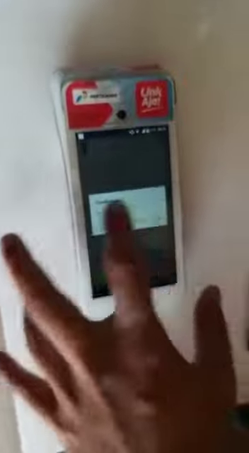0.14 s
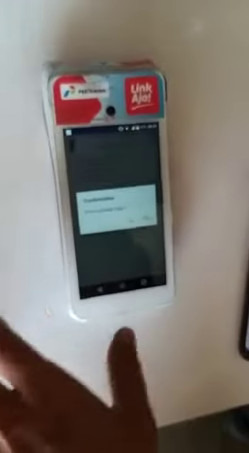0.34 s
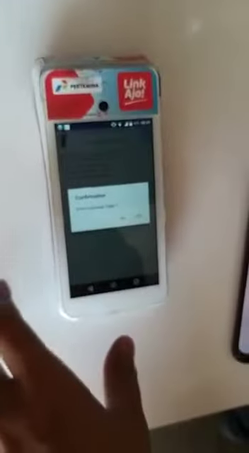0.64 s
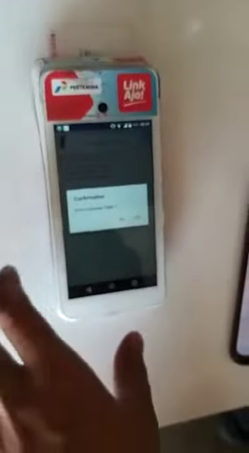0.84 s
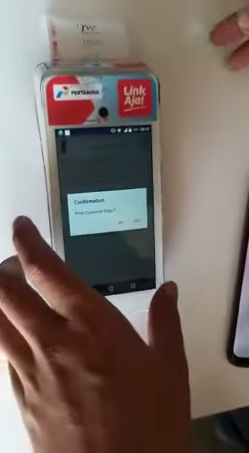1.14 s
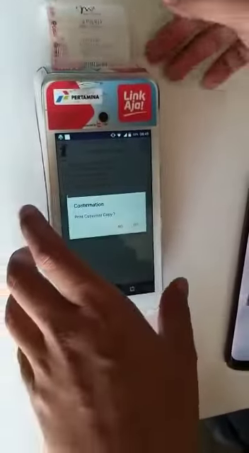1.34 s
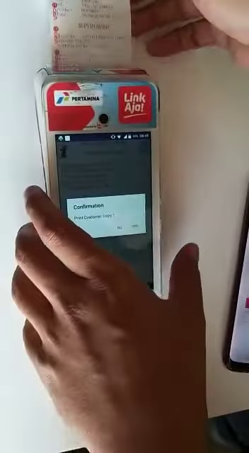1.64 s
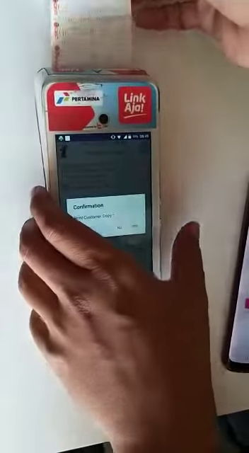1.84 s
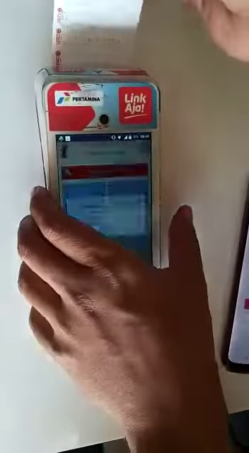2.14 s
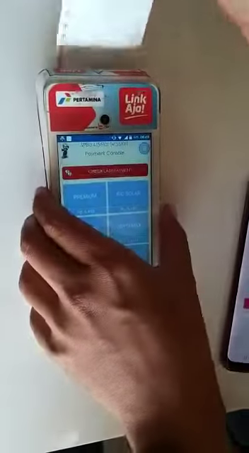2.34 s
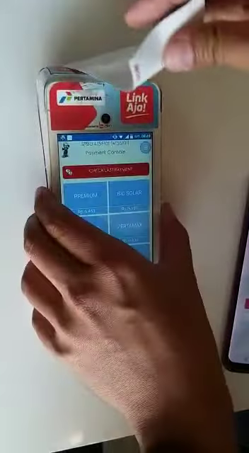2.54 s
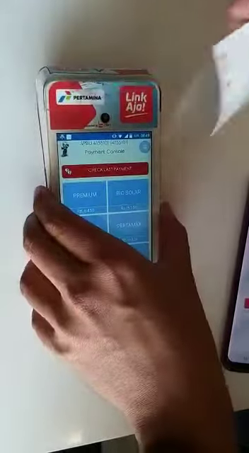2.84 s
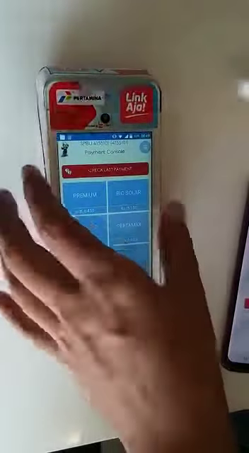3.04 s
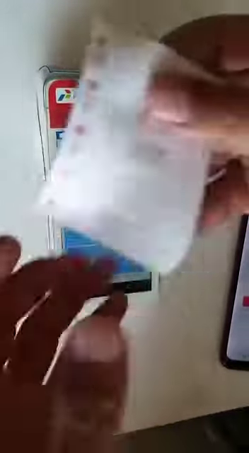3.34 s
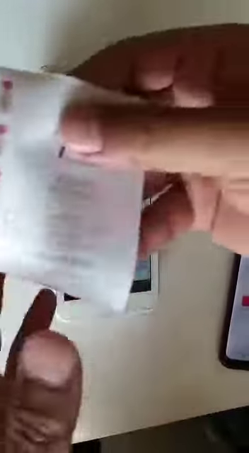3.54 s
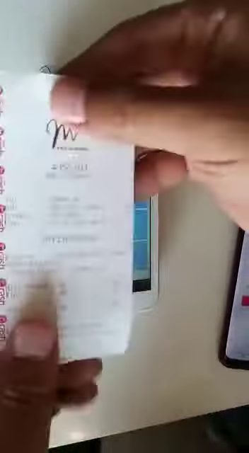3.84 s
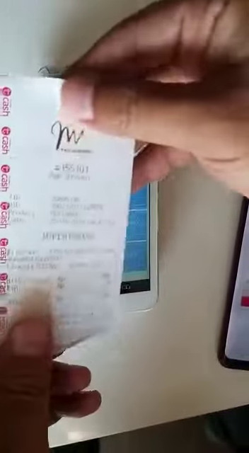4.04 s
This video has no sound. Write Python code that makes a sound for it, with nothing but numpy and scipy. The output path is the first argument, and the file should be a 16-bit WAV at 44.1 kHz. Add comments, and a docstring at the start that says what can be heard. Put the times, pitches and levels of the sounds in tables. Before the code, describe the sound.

A small receipt printer buzzes unevenly and stops; the paper is ripped off sharply, rustles softly and snaps taut.

```python
"""The stepper motor of a handheld payment terminal buzzes unevenly as it prints a receipt on a desk:
each step is an impulse that excites the resonances of the motor and its plastic case.
The paper is gripped, ripped across the toothed cutter and pulled taut between two hands; friction
makes it rustle, and fracture makes it crackle. Nearby walls give a short echo over a low outdoor rumble."""
import sys
import numpy as np
from scipy import signal
from scipy.fft import rfft, irfft
from scipy.io import wavfile
from scipy.ndimage import uniform_filter1d

SR = 44100
rng = np.random.default_rng(int(sys.argv[2]) if len(sys.argv) > 2 else 0)


def generate_wav(sig):
    """Save sig (samples, or channels by samples) to the path in sys.argv[1] as 16-bit PCM at SR."""
    pcm = np.round(np.clip(np.atleast_2d(sig).T, -1, 1) * 32767).astype(np.int16)
    wavfile.write(sys.argv[1], SR, pcm)


N = 183897
TIME = np.arange(N) / SR


def from_db(db):
    """Amplitude ratio of a level in decibels."""
    return 10 ** (np.asarray(db) / 20)


def rms_one(x):
    """Normalisation to unit rms."""
    return x / np.sqrt(np.mean(x ** 2) + 1e-20)


def peak_one(x):
    """Normalisation to unit peak."""
    return x / np.abs(x).max()


def in_time(curve):
    """Linear interpolation of a curve at every sample."""
    return np.interp(TIME, *np.transpose(curve))


def colour(x, spectrum, size=8192):
    """Minimum-phase filtering: folding the cepstrum gives a causal filter with the given spectrum."""
    hz = np.arange(size // 2 + 1) * SR / size
    points_hz, points_db = np.transpose(spectrum)
    gain = from_db(np.interp(np.log(hz + 1), np.log(points_hz), points_db))
    cepstrum = irfft(np.log(gain))
    cepstrum[1:size // 2] *= 2
    cepstrum[size // 2 + 1:] = 0
    return signal.fftconvolve(x, irfft(np.exp(rfft(cepstrum))))[:len(x)]


def cut(x, hz, kind):
    """Maximally flat low-, high- or band-pass filtering, 12 dB per octave."""
    return signal.sosfilt(signal.butter(2, hz, kind, fs=SR, output="sos"), x)


def resonate(x, modes):
    """Forced resonance: parallel pass bands, summed and scaled to unit rms."""
    return rms_one(sum(from_db(db) * cut(x, [max(hz - width / 2, 20), hz + width / 2], "band")
                       for hz, width, db in modes))


def jitter(hz):
    """Random modulation: low-passed noise of unit rms."""
    return rms_one(cut(rng.standard_normal(N), hz, "low"))


def phase_of(hz):
    """Phase as the integral of frequency."""
    return 2 * np.pi * np.cumsum(hz) / SR


def gate(start, length, fade_s=0.015):
    """Trapezoidal envelope, with its fades outside the given length."""
    return np.clip(1 + np.minimum(TIME - start, start + length - TIME) / fade_s, 0, 1)


def glides(rows, shake, harmonic=1):
    """Frequency modulation: one harmonic of short linear sweeps, their pitch multiplied by shake."""
    out = np.zeros(N)
    for start, length, start_hz, hz_per_s, db in rows:
        hz = start_hz + hz_per_s * np.clip(TIME - start, 0, length)
        out += from_db(db) * gate(start, length) * np.sin(harmonic * phase_of(hz * shake))
    return out


def strokes(rows, attack_s, sag_db_per_s, t60):
    """Envelope of hand movements: each swells, sags while it lasts and decays exponentially."""
    gain = np.zeros(N)
    for start, length, db in rows:
        age = TIME - start
        fall_db = sag_db_per_s * np.clip(age, 0, length) + 60 * np.clip((age - length) / t60, 0, 3)
        gain = np.maximum(gain, np.clip(1 + age / attack_s, 0, 1) * from_db(db - fall_db))
    return gain


def grains(per_s, spread_db):
    """Shot noise: random impulses of uneven size."""
    sizes = from_db(spread_db * np.minimum(rng.exponential(1, N), 4)) * rng.choice([-1, 1], N)
    return sizes * (rng.random(N) < per_s / SR)


def swell(peak_s, rise_s, t60):
    """Exponential growth and decay: 60 dB up in rise_s, 60 dB down in t60."""
    age = TIME - peak_s
    return from_db(-60 * np.minimum(np.maximum(-age / rise_s, age / t60), 4))


def crack(peak_s, rise_s, t60, slips_db):
    """Stress release: one impulse amid tiny slips that swell towards it and die away."""
    slips = rng.choice([-1, 1], N) * from_db(slips_db) * swell(peak_s, rise_s, t60)
    return slips + (np.arange(N) == round(peak_s * SR))


def ring(peak_s, rise_s, modes):
    """Modal vibration: sinusoids that build up, then decay at their own rates."""
    return sum(from_db(db) * swell(peak_s, rise_s, t60) * np.sin(2 * np.pi * hz * (TIME - peak_s))
               for hz, t60, db in modes)


def stereo(x, lag_ms, pan_db, scatter_db, scatter_t60, size=4096):
    """Path difference and scattering: above the bass the right lags; desk and hands scatter treble."""
    half = size // 2
    hz = np.arange(half + 1) * SR / size
    lag_s = lag_ms / 1000 * hz ** 4 / (hz ** 4 + 820 ** 4)
    direct = np.exp(1j * np.pi * hz * lag_s * [[1], [-1]])
    scatter = from_db(scatter_db) * hz ** 2 / np.hypot(hz ** 2, 1580 ** 2)
    diffuse = rfft(rng.standard_normal((2, size)) * from_db(-60 * TIME[:size] / scatter_t60))
    paths = direct + scatter * diffuse / diffuse.std()
    smoothed = np.sqrt(uniform_filter1d(np.abs(paths) ** 2, size=40))
    paths *= np.hypot(1, scatter) / smoothed   # the treble is lifted evenly
    response = np.roll(irfft(paths), half, axis=1)
    heard = signal.fftconvolve(x[None], response)[:, half:half + N]
    return heard * from_db([[pan_db / 2], [-pan_db / 2]])


# Spectrum of distant traffic: (frequency [Hz], relative level [dB])
TRAFFIC_SPECTRUM = [(15, -60.5), (25, -16.5), (38, -25), (52, -13), (70, -0.5), (170, -4.5), (373, -11),
                    (575, -21), (714, -17.5), (988, -25), (1100, -28), (2910, -36), (9000, -50.5),
                    (16000, -50)]
# Its stereo width: (frequency [Hz], side minus mid level [dB])
TRAFFIC_WIDTH = [(60, -17.5), (200, -15.5), (600, -6.5), (2000, 2.5)]
def traffic():
    """Diffuse field: the far rumble is alike on both sides only at long wavelengths."""
    mid, side = [rms_one(colour(rng.standard_normal(N), TRAFFIC_SPECTRUM)) for _ in range(2)]
    return from_db(-52) * (mid + colour(side, TRAFFIC_WIDTH) * [[1], [-1]])


# Motor speed, low on dense print and high on blank paper: (time [s], step rate [1/s])
STEP_RATE = [(0.6, 650), (0.665, 657), (0.69, 958), (0.82, 843), (0.88, 693), (0.945, 890), (0.98, 810),
             (1.05, 750), (1.1, 574), (1.14, 817), (1.215, 950), (1.28, 700), (1.335, 720), (1.42, 940),
             (1.5, 716), (1.61, 850), (1.665, 727), (1.72, 880), (1.77, 887), (1.97, 955)]
def stepper(steps_per_line=6, fast_hz=942.5):
    """Impulse excitation: each step gives a kick, and every line of dots takes its own time."""
    rate = in_time(STEP_RATE)
    octaves = np.log2(rate / fast_hz)
    uneven = .035 + .22 * np.maximum(1 - rate / fast_hz, 0)   # slow lines vary most
    line = (np.cumsum(rate) / SR / steps_per_line).astype(int)
    steps_turned = np.cumsum(rate * np.exp(uneven * rng.standard_normal(N)[line])) / SR
    step = steps_turned.astype(int)
    first_of_line = step % steps_per_line == 0
    force = from_db(8.8 * first_of_line) * (1 + 0.82 * rng.standard_normal(N))
    kicks = rms_one(cut(np.diff(step, prepend=0) * force, 72, "high"))
    return kicks, steps_turned, octaves


# Motor resonances: (frequency [Hz], bandwidth [Hz], relative level [dB])
MOTOR_RESONANCES = [(239, 149, -3.5), (645, 117, -2.5), (798, 96, 0.5), (924.4, 80, 1.5), (1259, 148, -4.5),
                    (1474, 180, -8.5)]
def motor(kicks, octaves):
    """Forced vibration: the kicks drive the motor's modes, more loudly at speed."""
    drive = kicks + 0.5 * rng.standard_normal(N)
    return from_db(-44 + 4.5 * octaves) * resonate(drive, MOTOR_RESONANCES)


# Resonances of the plastic case: (frequency [Hz], bandwidth [Hz], relative level [dB])
CASE_RESONANCES = [(1850, 93, -1.5), (2234, 440, -2), (2310, 100, -9), (2980, 900, -7.5)]
def case(rattle, octaves):
    """Structure-borne sound: the case radiates the gear rattle, slightly less at speed."""
    return from_db(-52 - octaves) * resonate(rattle, CASE_RESONANCES)


# Spectrum of paper rubbing on the print head: (frequency [Hz], relative level [dB])
FEED_SPECTRUM = [(2120, -31), (3600, -3.5), (4770, 0.5), (9350, -4.5), (11100, -10), (14900, -5.5),
                 (16000, -16)]
# Resonances of the paper slot: (frequency [Hz], bandwidth [Hz], relative level [dB])
SLOT_RESONANCES = [(4620, 230, 1.2), (5460, 120, 2.7)]
def paper_feed(rattle, steps_turned, octaves):
    """Friction noise: paper is dragged over the head step by step, while the rattle excites the slot."""
    rub = rng.standard_normal((2, N)) * (1 + 0.45 * np.cos(2 * np.pi * steps_turned))
    hiss = rms_one(np.array([colour(side, FEED_SPECTRUM) for side in rub]))
    slot = from_db(-12) * resonate(rattle, SLOT_RESONANCES)
    return from_db(6 * octaves + [[-55], [-57]]) * rms_one(hiss + slot)


# Steady tone of the drive: (time [s], level [dB])
WHINE_ENVELOPE = [(0.9, -49.5), (1.0, -52), (1.33, -48), (1.43, -49.5), (1.58, -49.5), (1.8, -50.5)]
# One glide per block of print: (time [s], duration [s], start frequency [Hz], sweep [Hz/s], level [dB])
WHINE_GLIDES = [(0.621, 0.035, 2020, 7000, -45.5), (0.991, 0.073, 2200, 500, -46),
                (1.225, 0.06, 2230, 1230, -53), (1.318, 0.04, 2220, 2500, -46),
                (1.366, 0.062, 2430, 3960, -52), (1.467, 0.056, 2230, 3504, -49.5),
                (1.547, 0.08, 2310, 2902, -49), (1.813, 0.054, 2740, 1200, -54),
                (1.895, 0.073, 2790, 4490, -47.5)]
def whine(hz=2310):
    """Frequency modulation: random shake roughens the drive's steady tone and its rising glides."""
    shake = 1 + 0.0579 * jitter(498)
    steady = from_db(in_time(WHINE_ENVELOPE)) * np.sin(phase_of(hz * shake))
    return steady + glides(WHINE_GLIDES, shake)


def printer(start_s=0.5985, stop_s=1.98):
    """Superposition: all parts of the mechanism sound together while the motor runs."""
    kicks, steps_turned, octaves = stepper()
    buzz = motor(kicks, octaves)
    rattle = kicks + 0.84 * rng.standard_normal(N)   # play in the gears
    hiss = paper_feed(rattle, steps_turned, octaves)
    low = stereo(buzz + groans(), lag_ms=0.33, pan_db=-1, scatter_db=-2.5, scatter_t60=0.012)
    high = stereo(case(rattle, octaves) + whine(),
                  lag_ms=0.36, pan_db=2.2, scatter_db=-4, scatter_t60=0.031)
    onset = np.clip((TIME - start_s) / 0.0058, 0, 1)
    coast = from_db(-60 * np.clip((TIME - stop_s) / 0.01896, 0, 2))   # the rollers come to a halt
    return onset * coast * (from_db(0.5) * low + high + hiss + rasps())


# Spectrum of the wall reflections: (frequency [Hz], relative level [dB])
WALL_SPECTRUM = [(100, -1.5), (480, 2), (820, -0.5), (1500, 2), (2350, -2), (3300, -2.5), (5600, -2.5),
                 (9000, -1), (16000, -8)]
def walls(x, t60, wet_db, build_s):
    """Reverberation: dense reflections build up and decay exponentially, differently on each side."""
    age = TIME[:SR]
    fade = from_db(-60 * age / t60) * np.clip(age / build_s, 0, 1)
    tails = [colour(rms_one(rng.standard_normal(SR) * fade), WALL_SPECTRUM) / np.sqrt(SR) for _ in x]
    return from_db(wet_db) * np.array([signal.fftconvolve(side, tail)[:N] for side, tail in zip(x, tails)])


# Buckles of the receipt and knocks of fingers or gears: (time [s], peak level [dB], relative treble [dB])
CLICK_EVENTS = [(0.607, -39, -24), (2.336, -43, -34), (2.403, -25, 0), (3.227, -48, 16), (3.631, -37, 24),
                (3.669, -35, 12), (3.713, -29.5, 6), (3.848, -41, -38), (4.141, -13.5, 11.5)]
# Spectrum of a click: (frequency [Hz], relative level [dB])
CLICK_SPECTRUM = [(210, -33.5), (350, 1.5), (1820, -1), (2540, -9), (4240, -3), (6230, -8), (6970, -0.5),
                  (9140, -14.5), (16000, -26)]
def clicks():
    """Buckling and impact: the paper snaps or the case is knocked; sharper contacts carry more treble."""
    out = np.zeros(N)
    for time, db, treble_db in CLICK_EVENTS:
        burst = colour(crack(time + 0.0015, rise_s=0.018, t60=0.016, slips_db=-1.5), CLICK_SPECTRUM)
        treble = from_db(treble_db - 4.5) * cut(burst, 3700, "high")
        out += from_db(db) * peak_one(cut(burst, 6900, "low") - treble)
    return stereo(out, lag_ms=0.078, pan_db=-0.5, scatter_db=-0.5, scatter_t60=0.0056)


# Scrapes in the slot: (time [s], duration [s], frequency [Hz], bandwidth [Hz], level [dB])
SLOT_SCRAPES = [(0.678, 0.04, 9000, 9500, -60), (0.678, 0.1, 3250, 400, -56), (1.35, 0.09, 5400, 700, -69),
                (1.7, 0.096, 4750, 500, -67), (1.9, 0.081, 9000, 11000, -59)]
def rasps():
    """Band-limited friction noise: the emerging paper scrapes in the slot."""
    return sum(from_db(db) * gate(start, length) * resonate(rng.standard_normal((2, N)), [(hz, width, 0)])
               for start, length, hz, width, db in SLOT_SCRAPES)


# Groans of the case: (time [s], duration [s], start frequency [Hz], sweep [Hz/s], relative level [dB])
GROAN_GLIDES = [(1.032, 0.07, 165, 700, -47.5), (1.633, 0.076, 405, 205, -52)]
def groans():
    """Forced vibration: the labouring motor draws low, shaky glides of two harmonics from the case."""
    shake = 1 + 0.036 * jitter(300)
    return glides(GROAN_GLIDES, shake) + from_db(-6) * glides(GROAN_GLIDES, shake, harmonic=2)


# The receipt is gripped, lifted and straightened: (time [s], duration [s], relative level [dB])
FINGER_SLIDES = [(2.005, 0.019, -58), (2.06, .07, -61.5), (2.19, 0.015, -63.5), (2.42, 0.21, -62),
                 (2.98, 0.12, -59), (3.165, 0.044, -64.5), (3.235, 0.067, -59), (3.35, 0.098, -64.5),
                 (3.625, 0.08, -58.5), (3.714, .004, -49), (3.73, .085, -60), (3.92, .06, -63.5)]
# Spectrum of the sliding sheet: (frequency [Hz], relative level [dB])
RUSTLE_SPECTRUM = [(880, -33), (1500, -19), (2340, -4), (3060, -3), (5100, 1.5), (6000, -4), (7100, -2.5),
                   (9280, -8), (12500, -8), (16000, -11.5)]
def rustle():
    """Stick-slip friction: the receipt catches and slides in the fingers, brighter when brisk."""
    flutter = from_db(2 * jitter(39.8))
    sliding = strokes(FINGER_SLIDES, attack_s=0.016, sag_db_per_s=40.5, t60=0.253)
    creases = [grains(per_s=5000, spread_db=1.5) for _ in range(2)]   # each side hears its own creases
    sheet = rms_one(np.array([colour(side, RUSTLE_SPECTRUM) for side in creases]))
    sizzle = peak_one(sliding) * rms_one(cut(creases, 10000, "high"))
    return sliding * flutter * (sheet + sizzle) * from_db([[3], [1.8]])


# Paper giving way at the cutter teeth: (time [s], level [dB], relative edge sizzle [dB])
TOOTH_BREAKS = [(2.558, -23, -16), (2.5802, -17.5, -14), (2.5848, -14.5, -10), (2.592, -13, 0),
                (2.6186, -13, -9), (2.6244, -15.5, -7), (2.632, -14, -19), (2.6454, -8, -8),
                (2.6477, -7.5, -6.5), (2.6493, -8, -18.5), (2.6683, -15, -4.5), (2.699, -11.5, -17.5),
                (2.7357, -14, -13), (2.7512, -22, -12), (2.7545, -16.5, -5), (2.77, -11, -3.5)]
# Spectrum of tearing paper: (frequency [Hz], relative level [dB])
TEAR_SPECTRUM = [(210, -50), (350, -10.5), (790, 3), (1090, -8), (2100, -1), (2310, -1), (3400, -3),
                 (5310, -5.5), (6640, -6), (9140, -15.5), (10900, -16), (12100, -8.5), (16000, -16)]
def tooth_cracks():
    """Stress concentration: the paper breaks at a tooth with a crack, and the parting edge sizzles."""
    out = np.zeros(N)
    for time, db, edge_db in TOOTH_BREAKS:
        burst = crack(time, rise_s=0.0027, t60=0.0068, slips_db=-14)
        paper = peak_one(cut(colour(burst, TEAR_SPECTRUM), 900, "high"))   # too brief to stir the case fully
        edge = from_db(edge_db) * peak_one(cut(burst, 7400, "high"))
        out += from_db(db) * (paper + edge)
    return stereo(out, lag_ms=0.2, pan_db=2, scatter_db=4.5, scatter_t60=0.0069)


# Tugs that drive the tear along the cutter: (time [s], duration [s], relative level [dB])
TEAR_TUGS = [(2.582, 0.021, -35), (2.62, 0.011, -27), (2.644, 0.081, -26.5), (2.733, 0.0077, -25),
             (2.748, 0.008, -27), (2.766, 0.0042, -25.5)]
# Speed of the tear: (time [s], tooth rate [1/s])
TOOTH_RATE = [(2.62, 740), (2.648, 850), (2.72, 720)]
def rip():
    """Progressive fracture: fibres part in a dense crackle, modulated as tooth after tooth bites."""
    pull = strokes(TEAR_TUGS, attack_s=0.002, sag_db_per_s=22, t60=0.043)
    shake = 1 + 0.0699 * jitter(297)
    bite = np.sin(phase_of(in_time(TOOTH_RATE) * shake))
    breaks = grains(per_s=4500, spread_db=3.5) * (1 + 0.6 * bite)
    fibres = pull * (rms_one(colour(breaks, TEAR_SPECTRUM)) + from_db(-10.5) * bite)
    return stereo(fibres, lag_ms=0.19, pan_db=0, scatter_db=5.5, scatter_t60=0.0045) + rocking(pull)


# Desk resonances: (frequency [Hz], bandwidth [Hz], relative level [dB])
DESK_RESONANCES = [(90, 59, 0), (169, 133, -2), (606, 310, -9)]
def rocking(pull, lag_s=0.044):
    """First-order lag: the case trails the pull and rocks on the desk, exciting its low modes."""
    pole = np.exp(-1 / (lag_s * SR))
    motion = signal.lfilter([1 - pole], [1, -pole], pull)
    return from_db(-10) * motion * resonate(rng.standard_normal(N), DESK_RESONANCES)


# Modes of the cutter blade: (frequency [Hz], 60 dB decay time [s], level [dB])
CUTTER_MODES = [(4476, 0.0066, -8.5), (6900, 0.005, -14.5)]
def blade():
    """Free vibration: the last tooth lets go, the paper no longer damps the blade, and it pings."""
    ping = ring(peak_s=2.7695, rise_s=0.005, modes=CUTTER_MODES)
    return stereo(ping, lag_ms=0, pan_db=9, scatter_db=-16.5, scatter_t60=0.019)


# The paper comes free, then snaps taut: (time [s], level [dB])
JOLTS = [(2.7711, -29), (4.14, -38)]
# Modes of a jolt: (frequency [Hz], 60 dB decay time [s], relative level [dB])
JOLT_MODES = [(91.5, 0.2, -9), (168.4, 0.13, -2.5), (530, 0.04, 0.5), (735, 0.1, -6)]
def thumps():
    """Transient excitation: a sudden change in paper tension sets off dull, damped modes."""
    return sum(from_db(db) * ring(time, rise_s=0.01, modes=JOLT_MODES) for time, db in JOLTS)


def scene():
    """Superposition of printer, paper, their reverberation and the background."""
    buzz = printer()
    paper = clicks() + rustle() + tooth_cracks() + rip()
    shielded = from_db(-2.5) * buzz   # the case shields the motor from the walls
    echo = walls(shielded + paper, t60=0.56, wet_db=-9, build_s=0.005)
    return traffic() + buzz + echo + paper + blade() + thumps()


def record(dry):
    """Band limiting: a steep elliptic low-pass removes the highest treble."""
    cutoff_hz = 15950
    return signal.sosfilt(signal.ellip(10, .2, 80, cutoff_hz, fs=SR, output="sos"), dry)


dry = scene()
out = record(dry)
generate_wav(out)
```